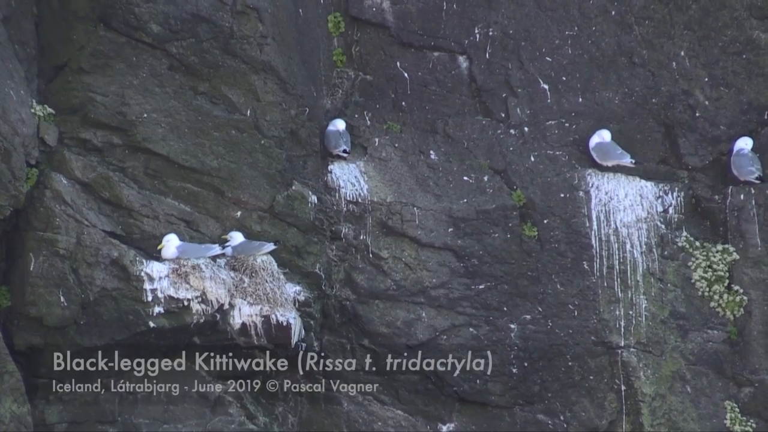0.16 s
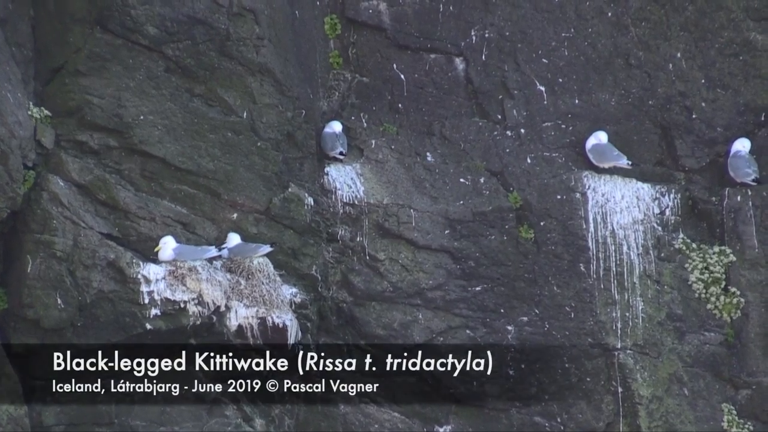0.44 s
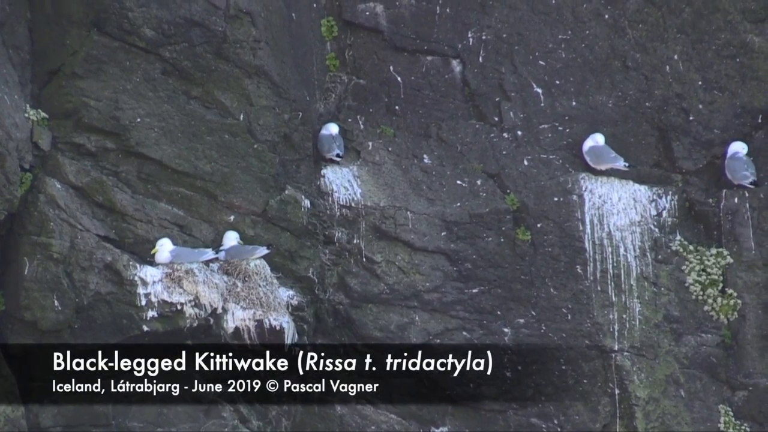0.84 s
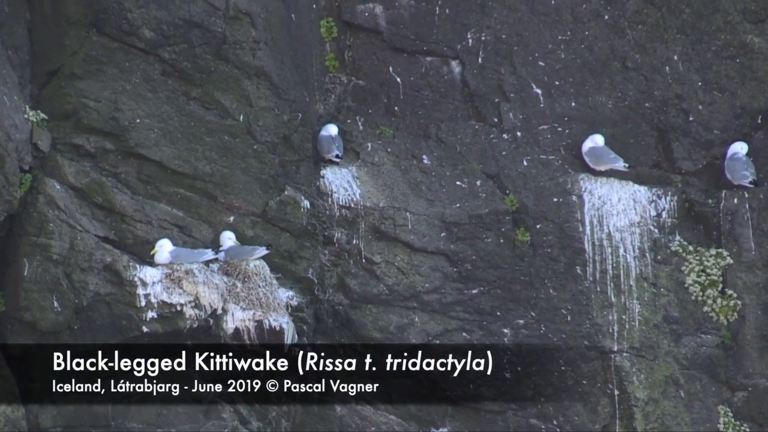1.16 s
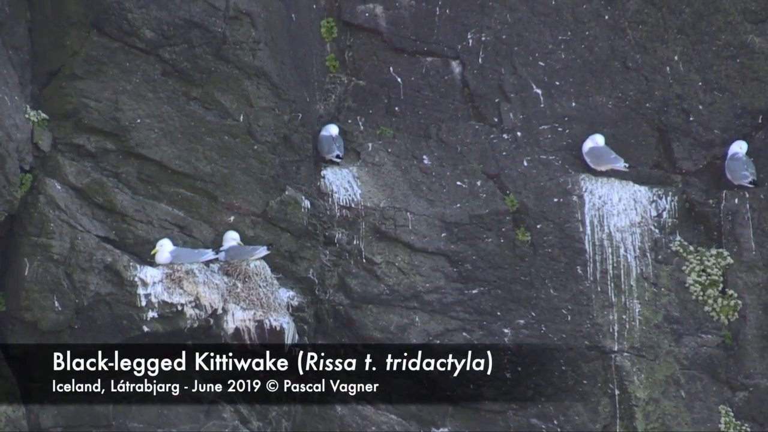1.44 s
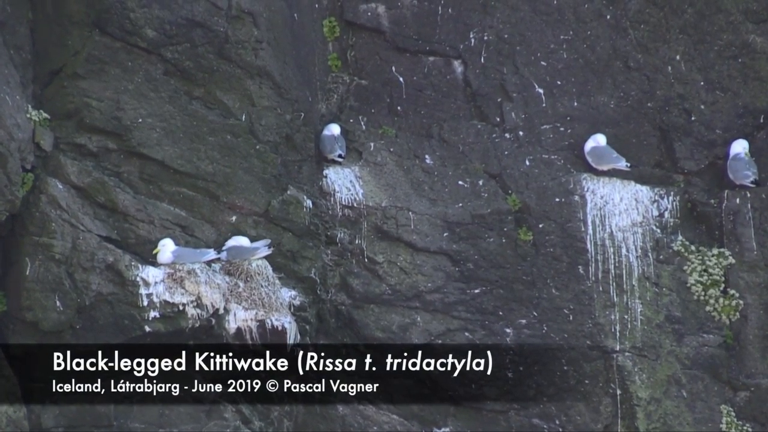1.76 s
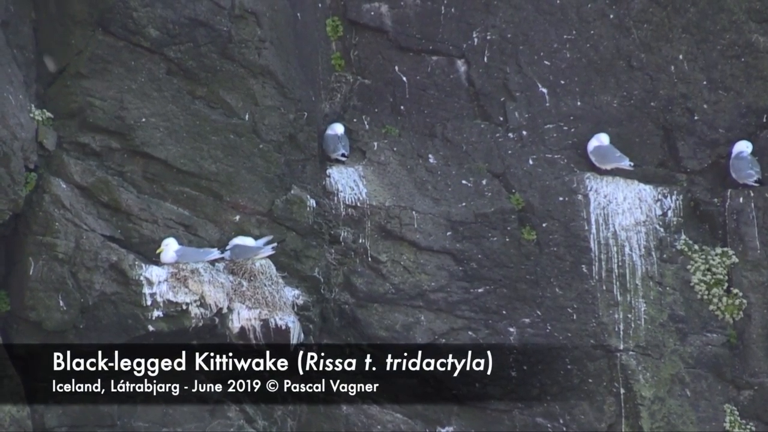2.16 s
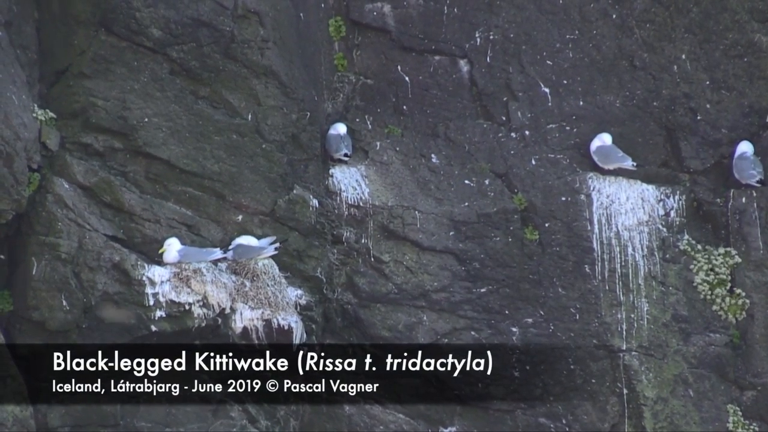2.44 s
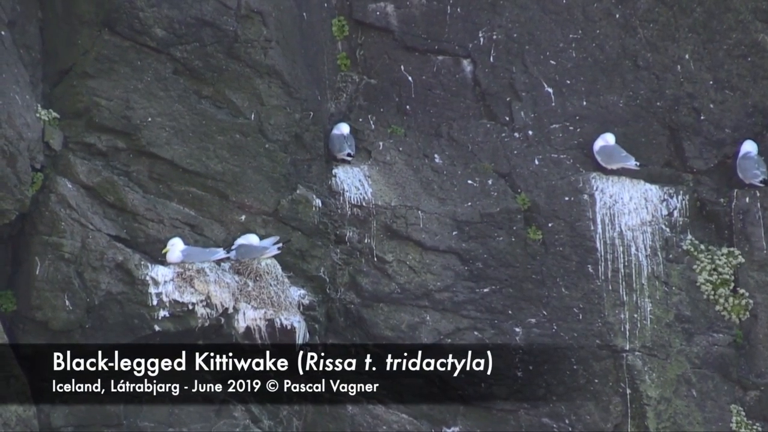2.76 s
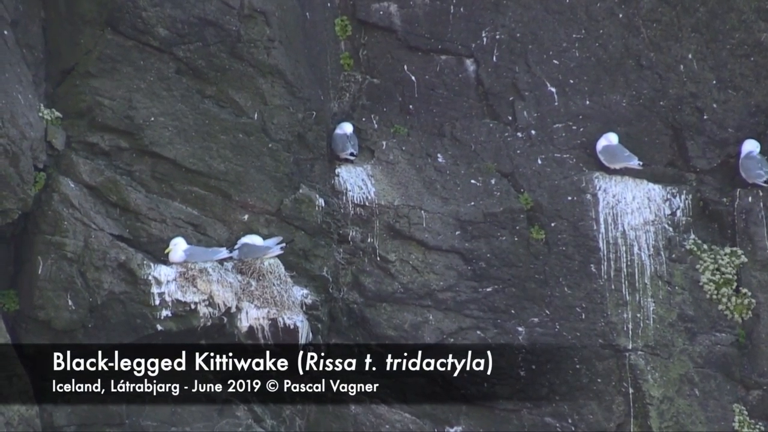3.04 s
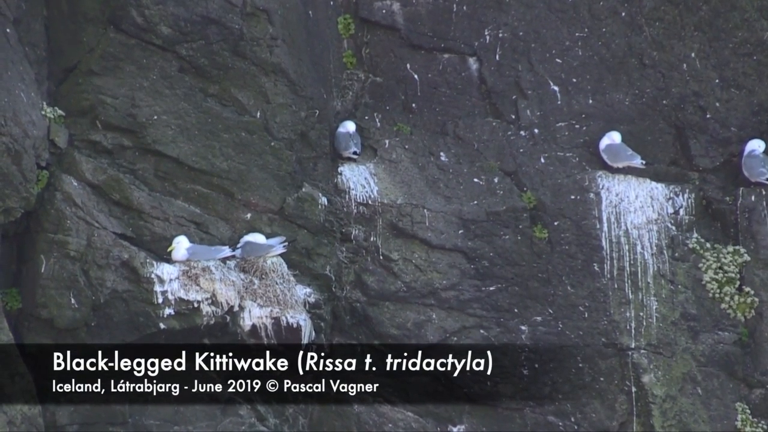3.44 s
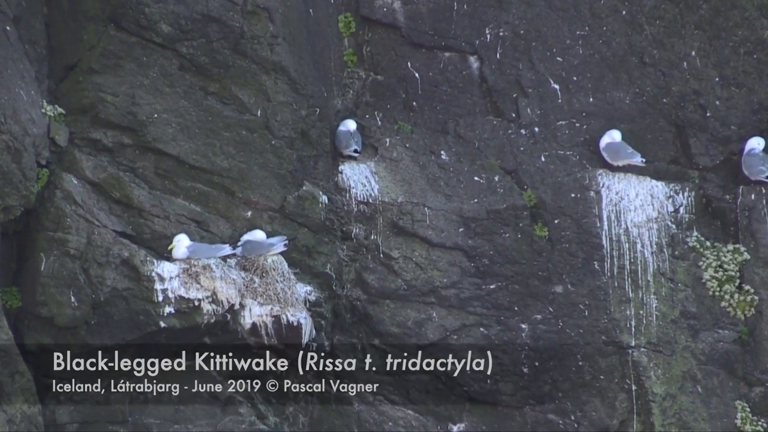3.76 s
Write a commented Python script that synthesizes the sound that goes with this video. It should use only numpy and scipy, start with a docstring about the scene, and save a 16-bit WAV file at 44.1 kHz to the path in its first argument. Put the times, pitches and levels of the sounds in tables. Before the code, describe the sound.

Cliff-nesting gulls give short rough honks and nasal cries over distant colony chatter and surf

```python
"""Near gulls squeal, wail and honk on a sea cliff, heard through a small stereo microphone.
Cries are fluttering harmonics on a pitch glide; honks are uneven pulses ringing throat resonances,
with a few bright snaps of noise and dull pops among them. Behind lie a blurred chorus of far birds,
built of random cries, and surf in bands of noise; gusts of lumpy low noise flutter on the microphone ports."""
import sys
import numpy as np
from scipy import signal
from scipy.fft import rfft, irfft, next_fast_len
from scipy.io import wavfile
from scipy.ndimage import uniform_filter1d

SR = 44100
rng = np.random.default_rng(int(sys.argv[2]) if len(sys.argv) > 2 else 0)


def level_to_linear(level):
    """Convert decibel levels to linear amplitude factors, elementwise."""
    exponent = np.asarray(level, float) / 20
    return 10 ** exponent


def dump_mix(stems):
    """Bounce the given channels to the path in sys.argv[1] as a 16-bit WAV at rate SR."""
    frames = np.atleast_2d(stems).T  # one column per channel
    limited = np.clip(frames, -1, 1)  # hard clip at full scale
    pcm = np.round(limited * 32767).astype(np.int16)
    wavfile.write(sys.argv[1], SR, pcm)


N = 172431
T = np.arange(N) / SR
START_S = .0365   # silence until here

# High squeals. Each row: start in seconds, length in seconds, start pitch in Hz, end pitch in Hz,
# level in dB, strongest region in Hz, lift of the odd partials in dB.
SQUEAL_CRIES = [(.275, 0.125, 914, 968, -40.5, 4600, 6), (.84, .13, 1100, 1035, -52, 3200, 7),
                (.357, 0.112, 944, 872, -25, 1910, -22), (1.13, 0.1, 877, 955, -40, 4600, -7),
                (1.22, 0.097, 925.5, 879, -29.5, 1960, -5.5), (2.098, 0.12, 924, 854, -35, 2710, -10.5),
                (3.012, 0.065, 896, 888, -36.5, 3560, -10), (3.05, 0.087, 860, 830, -38, 3380, -8.5),
                (3.865, 0.084, 933, 868, -38.5, 1800, -5)]
# Lower nasal wails. Each row: start in seconds, length in seconds, start pitch in Hz, end pitch in Hz,
# level in dB, strongest region in Hz.
WAIL_CRIES = [(.036, 0.13, 631, 648, -37, 1930), (.74, 0.1, 720, 685, -38.5, 2110),
              (.2, 0.24, 652, 696, -47, 1990), (.89, 0.14, 652, 664, -35, 2000),
              (1.015, 0.08, 602, 621, -43, 2420), (1.58, 0.12, 696.6, 701, -40.5, 2800),
              (1.94, 0.15, 627, 650, -40.5, 2500), (2.045, 0.14, 656.5, 672, -39, 2000),
              (2.47, 0.0744, 590, 621.5, -38.5, 3180), (2.96, 0.052, 611, 636, -36, 3140),
              (3.372, 0.048, 622, 627, -39.5, 3200), (3.75, 0.08, 633, 645, -44.5, 3220),
              (3.85, 0.11, 611.5, 629, -38.5, 3140)]
# Squeal timbre. Each entry: level in dB of partial 1, 2, and so on.
SQUEAL_PARTIALS_DB = [-8.5, 0, 3.5, -6, 2, -11, -10, -15]
# Wail timbre. Each entry: level in dB of partial 1, 2, and so on.
WAIL_PARTIALS_DB = [-11.5, -4, -4, -5.5, -3.5, -8, -9.5, -12, -19.5, -30, -24]
# Stereo place of cries and pops. Each row: time in seconds, left over right in dB.
CRY_PAN_DB = [(0, -2.5), (1.5, 2), (3.9, 1)]
FADE_DB, FADE_DB_PER_PARTIAL = 3.5, 0.26   # weakening over a cry's length, upper partials more
GLIDE_POWER = 1.41   # the pitch moves most towards the end
MOUTH_DB, MOUTH_OCTAVES = 5.5, 0.22   # lift and half-width of the strongest region
ATTACK_S, RELEASE_S = 0.0089, 0.013
WAVER = 0.0058   # pitch spread as a fraction
FLUTTER_DB = 1.9   # for partial 1, grows with the root of the partial number
RASP, RASP_HZ = .2, 200   # depth of the roughness, centre of its noise

# Short rough honks. Each row: start in seconds, level in dB before a 12 dB trim, throat in Hz,
# level of the upper throat in dB against the throat.
HONK_CALLS = [(0.1412, -25, 1440, -14), (0.4063, -23, 1290, -5), (0.4753, -21.5, 1320, -6),
              (0.5441, -21, 1310, -3), (0.6282, -19.5, 1290, -7), (0.7123, -21.5, 1280, -4),
              (0.8068, -18, 1300, -15), (0.876, -18, 1230, -36), (0.9265, -20, 1280, -19),
              (0.9902, -21.5, 1270, -25), (1.418, -27.5, 1280, -30), (1.6118, -20, 1277, -5.5),
              (1.7792, -17.5, 1280, -13), (1.91, -17.5, 1360, -15), (2.035, -19, 1330, -8),
              (2.1488, -25, 1510, 0.5), (2.264, -23, 1350, -29), (2.384, -24, 1335, -24),
              (2.5077, -28.5, 1340, -0.5), (2.643, -24.5, 1340, -0.5), (2.801, -23, 1400, -3.5),
              (2.9259, -28, 1260, 0.5), (3.053, -28, 1370, -1.5), (3.154, -25, 1390, -7.5),
              (3.306, -26.5, 1390, -9), ]
# Upper throat resonances. Each row: centre in Hz, width in Hz, gain in dB.
UPPER_RESONANCES = [(1800, 184, 14), (3350, 1520, 4.5)]
# Stereo place of honks. Each row: time in seconds, left over right in dB.
HONK_PAN_DB = [(0, -9.5), (1.9, 5), (3.9, 0)]
HONK_RISE_S, HONK_HOLD_S, HONK_FALL_S = .004, 0.017, 0.02   # the hold includes the rise
HONK_PULSE_HZ, HONK_JITTER = 298.1, .25   # mean pulse rate, spread as a fraction
THROAT_WIDTH_HZ = 240

# Bright snaps, perhaps of a wing or bill. Each row: start in seconds, level in dB, centre in Hz.
SNAP_BURSTS = [(1.204, -31.5, 5300), (1.215, -33, 5800)]
SNAP_S, SNAP_WIDTH = 0.0044, 1   # time to the peak, width as a fraction of the centre
# Short dull pops, a few cycles each. Each row: start in seconds, peak level in dB.
POP_CLICKS = [(2.214, -21), (2.221, -27), (2.32, -25), (2.506, -24), (2.517, -30), (2.55, -30),
              (2.571, -24.5)]
POP_HZ, POP_WIDTH_HZ = 1400, 480   # width of each of two passes

# Swell of the far colony. Each row: time in seconds, level in dB.
CHORUS_LEVEL = [(.04, -32), (.6, -37), (1.1, -32.5), (1.4, -39.5), (2.2, -39), (2.75, -48), (3.9, -39)]
# Resonances colouring the far colony. Each row: centre in Hz, width in Hz, gain in dB.
CHORUS_RESONANCES = [(1280, 350, 0.5), (1910, 420, 0), (2760, 780, -8.5), (4600, 2400, -25)]
CHORUS_CALLS = 400
CHORUS_SPREAD_DB, CHORUS_WET_DB = 4, 5   # range of call levels, gain of the echoes

# Surf spectrum. Each row: frequency in Hz, relative level in dB per Hz.
SURF_SPECTRUM = [(25, -25.5), (400, -25.5), (631, -10), (1300, -0.5), (1530, -7), (2300, -8),
                 (10900, -28.5), (14500, -38.5)]
# Surf stereo width. Each row: frequency in Hz, left-right likeness from -1 to 1.
SURF_LIKENESS = [(60, 0.27), (240, 0.058), (950, 0.7), (3770, -0.73), (15000, 0.46)]
# Surf stereo balance. Each row: frequency in Hz, left over right in dB.
SURF_PAN_DB = [(380, 1.5), (2380, 3), (15000, 2.5)]
SURF_DB, SURF_FOLLOWS = -40, 0.11   # mean level, dB of surf per dB of chorus swell
CLIFF_T60_S, CLIFF_CUT_HZ, CLIFF_DB = 0.32, 1500, -5.5   # decay, dulling, gain for near birds
LEFT_LAG = 2   # samples by which near birds reach the left port late

# Buffets of wind on the ports. Each row: start in seconds, length in seconds, level in dB, centre in Hz.
GUST_BUFFETS = [(0.4, 0.071, -38.5, 350), (0.474, 0.025, -30.5, 306), (0.642, .17, -39.5, 345),
                (0.857, 0.12, -38, 385), (1.135, 0.023, -30, 566), (1.173, 0.048, -39.5, 500),
                (1.229, 0.1, -42.5, 433), (1.398, 0.14, -46, 514), (1.579, 0.16, -43, 530),
                (1.769, 0.2, -38, 616), (1.96, 0.02, -33.5, 503), (2.001, 0.195, -48, 440),
                (2.194, 0.024, -30, 570), (2.252, 0.14, -43, 437), (2.544, 0.023, -35.5, 590),
                (2.674, 0.016, -43, 484)]
# Part common to both ports. Each row: time in seconds, gain in dB below the split, gain in dB above it.
GUST_COMMON = [(.8, -0.5, -21.5), (1.1, -6.5, -6)]
# Phase of the common part. Each row: time in seconds, turn in radians.
GUST_PHASE = [(.8, 1.24), (1.4, 0.7)]
GUST_EDGE_S, GUST_WIDTH = 0.013, 1.0   # rise and fall, width as a fraction of the centre
GUST_CUT_HZ, GUST_SPLIT_HZ, GUST_LUMP_DB = 152, 213, 3


def rms_one(x):
    """Scales a signal to an rms of 1."""
    return x / np.sqrt(np.mean(x ** 2) + 1e-20)


def at_time(points, s):
    """Reads a two-column curve over time."""
    return np.interp(s, *np.transpose(points))


def at_hz(points, hz):
    """Reads a two-column curve over log frequency."""
    points = np.array(points)
    return np.interp(np.log(hz), np.log(points[:, 0] + 1), points[:, 1])


def drift(rate, size=N):
    """Slow chance of rms 1: smoothed noise, drawn every 40 samples and joined by straight lines."""
    r = np.exp(-80 * np.pi * rate / SR)
    noise = rng.standard_normal(N // 40 + 2002)
    slow = signal.lfilter([1], [1, -2 * r, r * r], noise)[2000:]   # skips the filter's settling
    return np.interp(np.arange(size) / 40, np.arange(len(slow)), rms_one(slow))


def resonate(x, hz, width_hz):
    """One resonance, gain close to 1 on top."""
    r = np.exp(-np.pi * width_hz / SR)
    poles = [1, -2 * r * np.cos(2 * np.pi * hz / SR), r * r]
    return signal.lfilter([(1 - r * r) / 2, 0, (r * r - 1) / 2], poles, x)


def butter(x, order, hz, kind):
    """Butterworth filter."""
    return signal.sosfilt(signal.butter(order, hz, kind, fs=SR, output="sos"), x)


def add(out, s, sound, pan_db):
    """Places a sound in both channels, split by the left-over-right level."""
    i = int(s * SR)
    sides = level_to_linear([[pan_db / 2], [-pan_db / 2]])
    out[:, i:i + len(sound)] += (sound * sides)[:, :max(N - i, 0)]


def surf():
    """Half-octave bands of stereo noise with their own level, flicker and likeness."""
    out, together = 0, drift(2.5)
    edges = 20 * 2 ** np.arange(0, 9.9, .5)
    white = rng.standard_normal((2, 2, N))   # neighbouring bands use different noise
    for k, (low, high) in enumerate(zip(edges, edges[1:])):
        mid, side = butter(white[k % 2], 3, [low, high], "band")
        hz = np.sqrt(low * high)
        alike = np.clip(at_hz(SURF_LIKENESS, hz), -1, 1)
        pan_db = at_hz(SURF_PAN_DB, hz)
        gain = level_to_linear(at_hz(SURF_SPECTRUM, hz) + 1.21 * together + 0.23 * drift(3.8))
        stereo = np.sqrt(1 + alike) * mid + np.sqrt(1 - alike) * side * [[1], [-1]]
        out = out + gain * level_to_linear([[pan_db / 2], [-pan_db / 2]]) * stereo
    return rms_one(out)


def chorus(level_db):
    """Many far birds cry at random, blurred by the cliff."""
    u = rng.random((CHORUS_CALLS, 7))
    start, length = u[:, 0] * N / SR, .015 + .04 * u[:, 1]
    hz = 560 * 2 ** (.95 * u[:, 2])
    end_hz = hz * (.92 + .12 * u[:, 3])
    rows = np.c_[start, length, hz, end_hz, -CHORUS_SPREAD_DB * u[:, 4], 1200 + 2500 * u[:, 6]]
    calls = cries(rows, np.r_[-20, np.zeros(6)], 12 * u[:, 5] - 5)
    calls = sum(level_to_linear(g) * resonate(calls, f, w) for f, w, g in CHORUS_RESONANCES)
    calls = butter(calls, 3, 600, "high")
    return level_to_linear(level_db) * rms_one(calls + level_to_linear(CHORUS_WET_DB) * cliff(calls.sum(0)))


def cries(rows, partials_db, pans_db):
    """Harmonic cries on a glide; the pitch wavers, each partial flutters and noise roughens the tone."""
    out, waver = np.zeros((2, N)), drift(36.0)
    flutter = [drift(71) for _ in partials_db]
    rasp = rng.standard_normal(N)
    for _ in range(3):
        rasp = resonate(rasp, RASP_HZ, RASP_HZ)
    rasp = rms_one(rasp)
    k = np.arange(1, len(partials_db) + 1)
    for (s, length, hz0, hz1, db, mouth_hz, *odd_db), pan_db in zip(rows, pans_db):
        t = np.arange(int((length + 3 * RELEASE_S) * SR)) / SR
        i = (int(s * SR) + np.arange(len(t))) % N
        hz = (hz0 + (hz1 - hz0) * (t / length) ** GLIDE_POWER) * (1 + WAVER * waver[i])
        phase = 2 * np.pi * np.cumsum(hz) / SR
        octaves = np.log2(k * (hz0 + hz1) / 2 / mouth_hz)   # from the strongest region
        mouth = MOUTH_DB * np.exp(-(octaves / MOUTH_OCTAVES) ** 2)
        levels = partials_db + sum(odd_db) * (k % 2) + mouth
        tone = 0
        for n, level, f in zip(k, levels, flutter):
            fade = FADE_DB_PER_PARTIAL * n * (t / length) ** 2
            gain = level_to_linear(level + FLUTTER_DB * np.sqrt(n) * f[i] - fade)
            tone = tone + gain * np.sin(n * phase + n * n)
        release = np.exp(-2 * np.maximum(t - length, 0) / RELEASE_S)
        shape = np.minimum(t / ATTACK_S, 1) * level_to_linear(-FADE_DB * t / length) * release
        add(out, s, level_to_linear(db) * rms_one(tone * (1 + RASP * rasp[i])) * shape, pan_db)
    return out


def cliff(x):
    """Dull repeating echoes off rock: six feedback loops for each side, with different lags."""
    size = next_fast_len(N + SR)
    w, out = 2 * np.pi * np.arange(size // 2 + 1) / size, np.zeros((2, N))
    dull = 1 / (1 + 1j * w * SR / (2 * np.pi * CLIFF_CUT_HZ))
    for ch, lags in enumerate(rng.uniform(.015, .06, (2, 6))):   # seconds
        loops = [level_to_linear(-60 * lag / CLIFF_T60_S) * dull * np.exp(-1j * w * lag * SR) for lag in lags]
        echoes = sum(g / (1 - g) * (-1) ** k for k, g in enumerate(loops))
        out[ch] = irfft(rfft(x, size) * echoes, size)[:N]
    return out


def wails():
    """Near nasal wails: harmonic cries on a low pitch."""
    return cries(WAIL_CRIES, WAIL_PARTIALS_DB, at_time(CRY_PAN_DB, np.array(WAIL_CRIES)[:, 0]))


def honks():
    """Uneven pulses ring a narrow throat and upper resonances."""
    out, t = np.zeros((2, N)), np.arange(int(.1 * SR)) / SR
    shape = np.minimum(t / HONK_RISE_S, 1) * np.exp(-np.maximum(t - HONK_HOLD_S, 0) / HONK_FALL_S)
    for s, db, hz, upper_db in HONK_CALLS:
        chance = rng.standard_normal((3, len(t)))
        jitter = HONK_JITTER * rms_one(uniform_filter1d(chance[0], size=100))
        turns = np.cumsum(HONK_PULSE_HZ * (1 + jitter)) / SR
        pulses = np.diff(np.floor(turns), prepend=0)
        pulses = pulses * (1 + 0.043 * chance[1]) + 0.075 * chance[2]   # uneven strength, added noise
        low = rms_one(resonate(resonate(pulses, hz, 2 * THROAT_WIDTH_HZ), hz, THROAT_WIDTH_HZ))
        high = 0
        for k, (f, w, g) in enumerate(UPPER_RESONANCES):
            high = high + level_to_linear(g) * resonate(pulses, f, w) * (-1) ** k   # alternating sign
        honk = low + level_to_linear(upper_db) * rms_one(high)
        add(out, s, level_to_linear(db - 12) * shape * honk, at_time(HONK_PAN_DB, s))
    return out


def squeals():
    """Near squeals: harmonic cries on a high pitch, odd partials lifted or lowered."""
    return cries(SQUEAL_CRIES, SQUEAL_PARTIALS_DB, at_time(CRY_PAN_DB, np.array(SQUEAL_CRIES)[:, 0]))


def wind():
    """Lumpy low noise in buffets: an opposite part in the two ports plus a phase-turned common part."""
    gusts, lumps = np.zeros((2, N)), level_to_linear(GUST_LUMP_DB * drift(62))
    for s, length, db, hz in GUST_BUFFETS:
        t = np.arange(int((length + 6 * GUST_EDGE_S) * SR)) / SR
        noise = rms_one(resonate(rng.standard_normal(SR // 2)[:len(t)], hz, GUST_WIDTH * hz))
        fall = np.exp(-np.maximum(t - length, 0) / GUST_EDGE_S)
        add(gusts, s, level_to_linear(db) * noise * np.minimum(t / GUST_EDGE_S, 1) * fall, 0)
    side = butter(gusts[0] * rms_one(lumps) + 1e-18, 3, [GUST_CUT_HZ, 2000], "band")
    low = signal.sosfiltfilt(signal.butter(3, GUST_SPLIT_HZ, fs=SR, output="sos"), side)
    s, low_db, high_db = np.transpose(GUST_COMMON)
    common = level_to_linear(np.interp(T, s, low_db)) * low + level_to_linear(np.interp(T, s, high_db)) * (side - low)
    turn = np.exp(1j * at_time(GUST_PHASE, T))
    mid = np.real(signal.hilbert(common, next_fast_len(N))[:N] * turn)
    return np.array([mid + side, mid - side])


def snaps():
    """Bright, short bursts of resonant noise."""
    out, t = np.zeros((2, N)), np.arange(1000) / SR
    shape = t / SNAP_S * np.exp(1 - t / SNAP_S)
    for s, db, hz in SNAP_BURSTS:
        noise = rms_one(resonate(rng.standard_normal(len(t)), hz, SNAP_WIDTH * hz))
        add(out, s, level_to_linear(db) * noise * shape, 0)
    return out


def pops():
    """Single clicks through a doubled resonance."""
    out, click = np.zeros((2, N)), np.r_[1., np.zeros(600)]
    for s, db in POP_CLICKS:
        hz = POP_HZ * rng.uniform(.9, 1.1)
        pop = resonate(resonate(click, hz, POP_WIDTH_HZ), hz, POP_WIDTH_HZ)
        add(out, s, level_to_linear(db) * pop / np.abs(pop).max(), at_time(CRY_PAN_DB, s))
    return out


def scene():
    """All sources; near birds reach the left port a little late and echo off the cliff."""
    level_db = at_time(CHORUS_LEVEL, T)
    near = wails() + honks() + squeals() + snaps() + pops()
    near = butter(near + 1e-18, 2, [600, 16000], "band")
    direct = np.array([np.roll(near[0], LEFT_LAG), near[1]])
    near = direct + level_to_linear(CLIFF_DB) * cliff(near.mean(0))
    surf_db = SURF_DB + SURF_FOLLOWS * (level_db - level_db.mean())
    return near + chorus(level_db) + level_to_linear(surf_db) * surf() + wind()


def top_cut(x):
    """Nothing passes above the cut-off."""
    return signal.sosfilt(signal.butter(12, 15770, fs=SR, output="sos"), x)


def record(dry):
    """The recorder opens shortly after zero."""
    opened = dry * (T > START_S)
    return top_cut(opened)


dry = scene()
out = record(dry)
dump_mix(out)
```